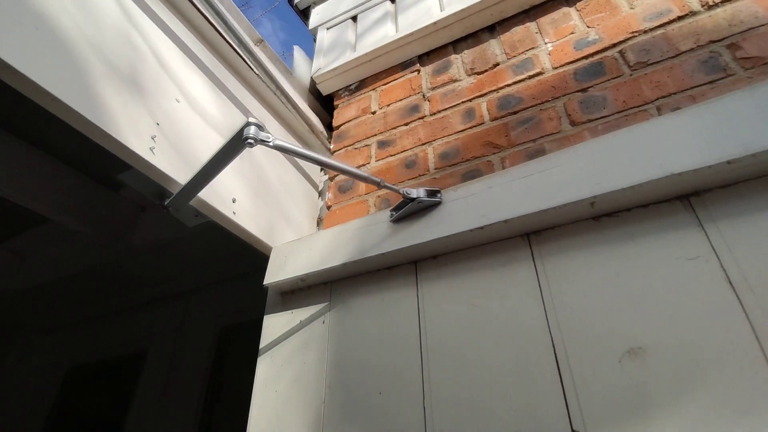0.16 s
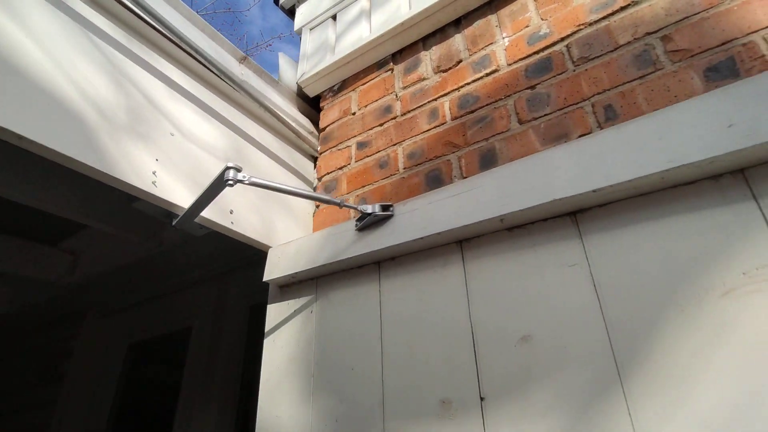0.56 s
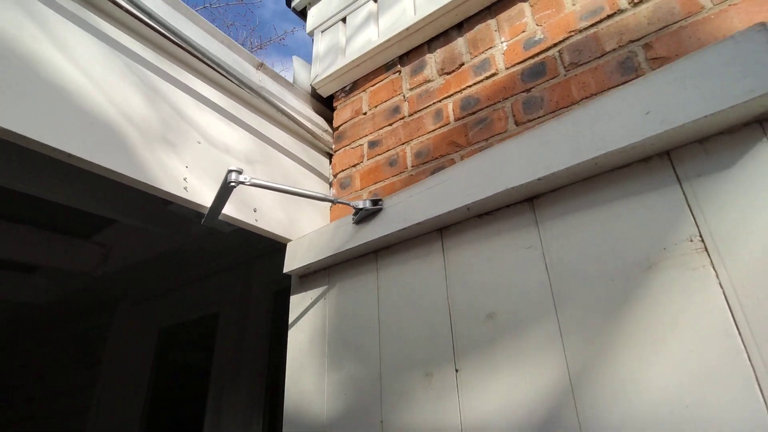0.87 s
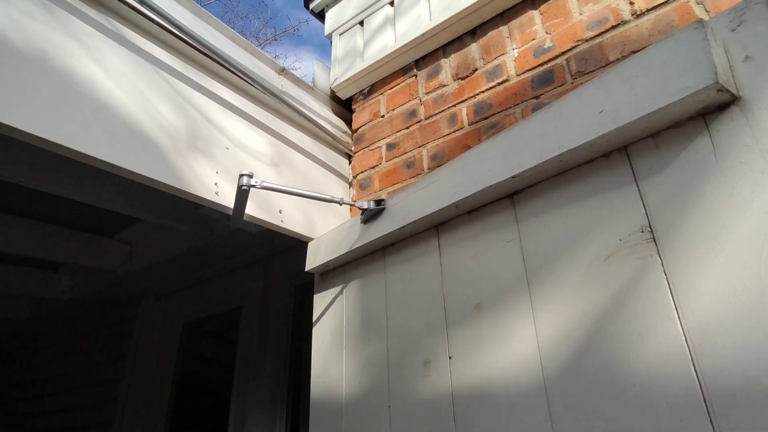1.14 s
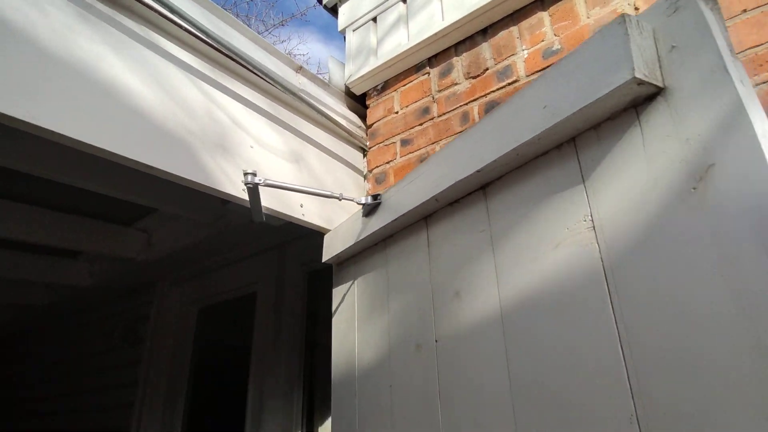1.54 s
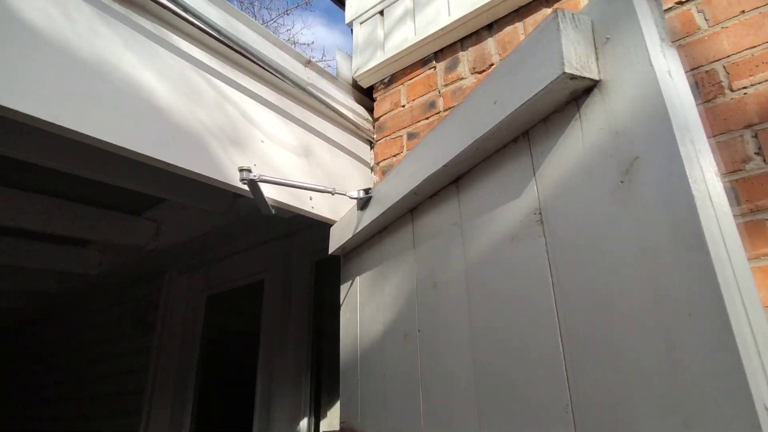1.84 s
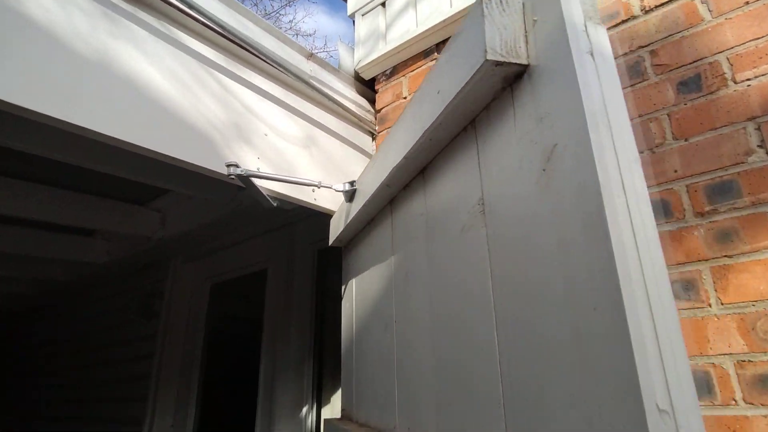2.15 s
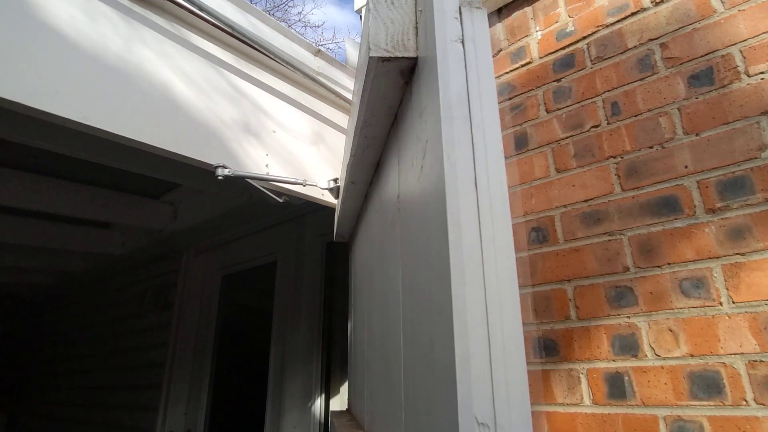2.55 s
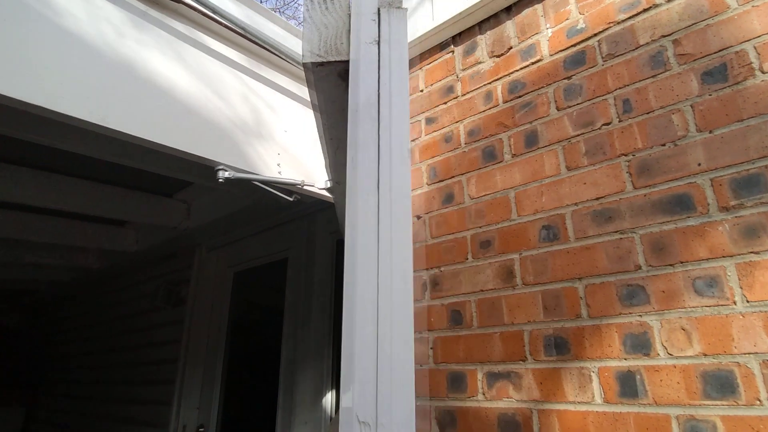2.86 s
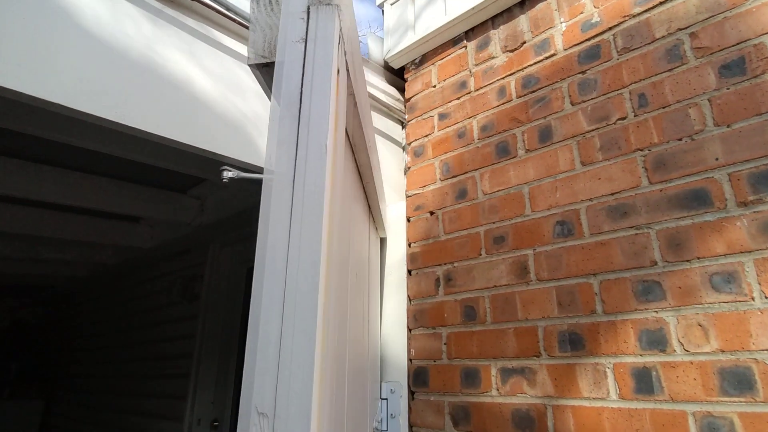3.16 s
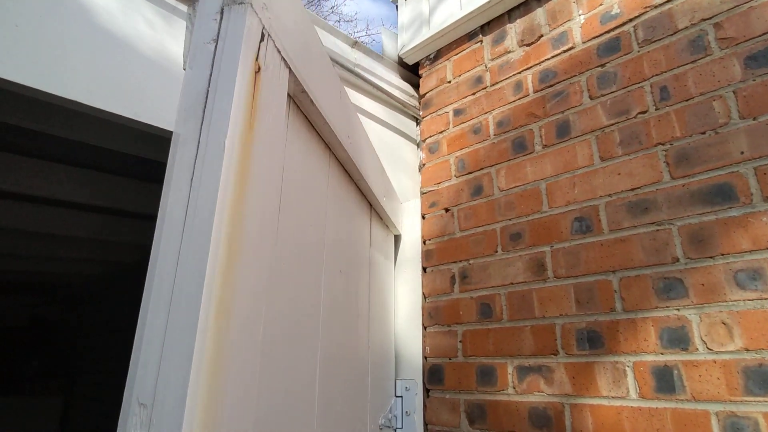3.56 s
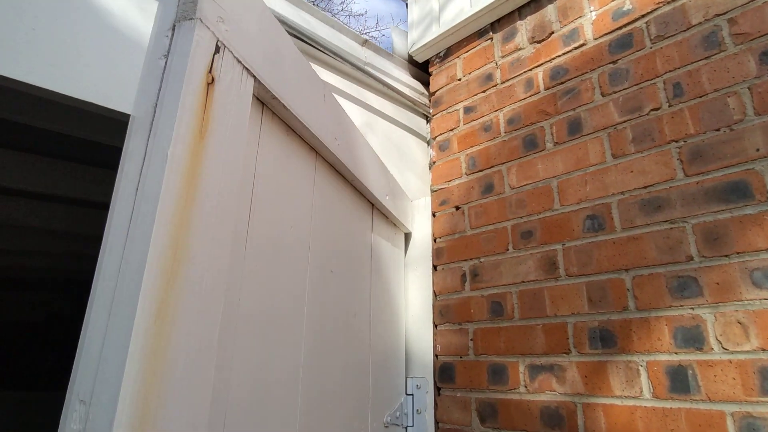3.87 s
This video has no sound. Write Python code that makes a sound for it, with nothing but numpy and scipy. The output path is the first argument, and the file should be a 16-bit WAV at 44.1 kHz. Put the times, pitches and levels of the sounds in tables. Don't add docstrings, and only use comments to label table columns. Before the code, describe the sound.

A small piston air compressor drones and clatters inside a garage a few metres away, ticks once from the door arm, then stops abruptly with a short hollow ring and air hiss; wind buffets the handheld microphone.

```python
import sys
import numpy as np
from scipy import signal
from scipy.fft import rfft, irfft
from scipy.io import wavfile

SR = 44100
rng = np.random.default_rng(int(sys.argv[2]) if len(sys.argv) > 2 else 0)


def how_loud(loudness_db):
    steps = np.asarray(loudness_db, float) / 20
    return 10 ** steps


def output_pcm(signal):
    pcm = np.clip(np.atleast_2d(signal).T, -1, 1) * 32767
    wavfile.write(sys.argv[1], SR, np.round(pcm).astype(np.int16))


N = 176400
T = np.arange(N) / SR
STROKE_HZ, STOP_S = 54.11, 1.915


def rms_one(x):
    return x / np.sqrt(np.mean(x ** 2) + 1e-20)


def in_time(rows):
    s, *columns = np.transpose(rows)
    return np.array([np.interp(T, s, column) for column in columns])


def at_hz(points, hz):
    point_hz, value = np.array(points)[:, 0], np.array(points)[:, 1]
    return np.interp(np.log(hz), np.log(point_hz), value)


def drift(rate_hz):
    r = np.exp(-80 * np.pi * rate_hz / SR)
    slow = signal.lfilter([1], [1, -2 * r, r * r], rng.standard_normal(N // 40 + 2002))[2000:]
    return np.interp(np.arange(N) / 40, np.arange(len(slow)), rms_one(slow))


def resonate(x, hz, width_hz):
    r = np.exp(-np.pi * width_hz / SR)
    feedback = [1, -2 * r * np.cos(2 * np.pi * hz / SR), r * r]
    return signal.lfilter([(1 - r * r) / 2, 0, (r * r - 1) / 2], feedback, x)


def coloured(spectrum, patchy_db):
    # f/Hz, correlation/-1..1
    likeness = [(60, 1), (180, 1), (550, -0.26), (1650, 0.0097), (4970, -0.09), (15000, 0.12)]
    hz = np.fft.rfftfreq(N, 1 / SR) + 1
    mid, side = rfft(rng.standard_normal((2, N)))
    alike = np.clip(at_hz(likeness, hz), -1, 1)
    pair = np.sqrt(1 + alike) * mid + np.sqrt(1 - alike) * side * [[1], [-1]]
    pair *= how_loud(at_hz(spectrum, hz)) * (hz > spectrum[0][0] / 2)
    octave, together = np.clip(np.log2(hz / 60), 0, 8), drift(5)
    out = 0
    for k in range(9):
        band = irfft(pair * np.clip(1 - abs(octave - k), 0, 1), N)
        out = out + band * how_loud(patchy_db * (1.27 * together + drift(24.0)))
    return rms_one(out)


def compressor():
    n = int(2.3 * SR)
    after = np.clip(T - STOP_S, 0, None)
    sag, rundown_s = 0.2, 0.15
    speed = 1 - sag * (1 - np.exp(-after[:n] / rundown_s))
    turn = 2 * np.pi * STROKE_HZ * np.cumsum(speed) / SR
    out = valve_clatter(np.pad(np.sin(turn), (0, N - n))) + narrow_whistles()
    out[:, :n] += piston_tones(turn)
    direct = out * how_loud(-292 * after)
    coasting = out * how_loud(-126 * after) * (T > STOP_S - 0.03)
    return direct + np.clip((T - STOP_S) / 0.045, 0, 1) * garage(coasting)


def piston_tones(turn):
    # multiple of stroke rate, level/dB, drift/(dB/s), echo share/0-1, echo cancels at t/s,
    # echo beat f/Hz
    strokes = [(1, -40.0, 0, 0.1, 0.85, 0.75), (2, -23.0, -3, 0.3, 0.65, 0.2),
               (3, -20.0, 0, 0.1, 1.95, 0.3), (4, -34.0, -5, 0.8, 0.45, 0.2), (5, -38.0, -2, 0.1, 0.8, 0.4),
               (6, -27.0, -4, 0.2, 0.4, 0.45), (7, -30.0, -1, 0.1, 0.0, 1.0), (8, -40.0, -7, 0.2, 0.1, 1.1),
               (9, -30.0, 0, 0.3, 1.05, 0.55), (10, -26.0, -3, 0.8, 0.55, 0.2),
               (11, -28.0, -2, 0.8, 0.95, 0.35), (12, -36.0, 7, 0.4, 0.65, 0.55),
               (13, -34.0, 8, 0.2, 0.1, 0.5), (14, -25.0, -2, 0.4, 0.45, 0.75),
               (15, -27.0, 1, 0.5, 0.05, 0.6), (16, -35.0, -2, 0.5, 0.8, 0.9),
               (17, -34.0, 3, 0.3, 0.05, 0.95), (18, -31.0, -3, 0.4, 1.4, 0.55),
               (19, -36.0, -1, 0.5, 0.35, 1.3), (20, -34.0, 0, 0.3, 0.75, 1.15),
               (21, -39.0, 3, 0.2, 0.45, 1.65), (22, -36.0, 4, 0.5, 0.4, 1.1),
               (23, -39.0, 2, 0.4, 0.2, 1.45), (24, -40.0, -1, 0.3, 0.75, 0.5),
               (25, -35.0, -1, 0.6, 0.8, 0.2), (26, -35.0, 3, 0.2, 0.9, 1.05),
               (29, -42.0, 0, 0.4, 0.55, 1.1), (31, -32.0, 14, 0.9, 1.7, 0.2),
               (32, -38.0, 3, 0.8, 1.35, 0.5), (33, -37.0, -1, 0.6, 1.0, 0.25),
               (34, -33.0, -11, 0.6, 0.5, 0.25)]
    # level/dB, echo share/0-1, echo cancels at t/s, echo beat f/Hz
    port_difference = [(-51.0, 0.1, 0.45, 0.85), (-40.0, 0.1, 0.55, 0.25), (-33.0, 0.2, 0.6, 0.2),
                       (-45.0, 0.4, 1.5, 0.6), (-47.0, 0.3, 0.5, 0.45), (-35.0, 0.1, 1.35, 0.35),
                       (-38.0, 0.8, 1.35, 0.2), (-39.0, 0.6, 1.85, 0.2), (-32.0, 0.6, 0.2, 0.55),
                       (-34.0, 0.5, -0.3, 0.4), (-30.0, 0.5, 0.55, 0.25), (-37.0, 0.5, 0.45, 0.45),
                       (-36.0, 0.2, -0.45, 0.35), (-27.0, 0.7, 0.9, 0.85), (-32.0, 0.5, 1.15, 0.4),
                       (-37.0, 0.4, 1.5, 0.4), (-42.0, 0.6, 0.55, 1.2), (-23.0, 0.5, 0.05, 0.25),
                       (-30.0, 0.4, 0.15, 0.55), (-32.0, 0.5, 1.05, 0.95), (-38.0, 0.3, 1.25, 0.65),
                       (-37.0, 0.4, 0.35, 0.65), (-39.0, 0.6, 0.2, 0.4), (-33.0, 0.3, 1.15, 0.45),
                       (-39.0, 0.3, 0.3, 1.55), (-40.0, 0.3, 0.1, 0.85), (-40.0, 0.9, 2.15, 0.25),
                       (-39.0, 0.5, 0.65, 0.65), (-39.0, 0.6, 1.3, 0.7), (-38.0, 0.6, 1.55, 0.6),
                       (-34.0, 0.6, 0.9, 0.2)]
    rows = [(*both, *across) for both, across in zip(strokes, port_difference)]

    # multiple,
    # level/dB
    faint = [(k, -41.5 - 0.3484 * (k - 30)) for k in [27, 28, 30, *range(35, 50)]]
    faint += [(k + 0.5, -47) for k in range(1, 16)]
    faint += [(8.5, -44)]
    echo_share, walk_m_per_s, sound_m_per_s = 0.31, 0.15, 343
    for k, level_db in faint:
        beat_hz = k * STROKE_HZ * walk_m_per_s / sound_m_per_s
        both = (k, level_db, 0, echo_share, rng.random(), beat_hz)
        rows.append((*both, level_db, echo_share, rng.random(), beat_hz))

    t = T[:len(turn)]
    walk = np.minimum(t, STOP_S)
    out = np.zeros((2, len(turn)))
    for k, level_db, slope, share, null_s, beat_hz, across_db, *across_echo in rows:
        start, lean = rng.uniform(-1, 1, 2)
        phase = k * turn + np.pi * start
        both = how_loud(level_db + slope * (walk - 1)) * echoed(phase, walk, share, null_s, beat_hz)
        across = how_loud(across_db) * echoed(phase + 1.36 + 0.14 * lean, walk, *across_echo)
        out += both + across * [[1], [-1]]
    return out


def echoed(phase, t, share, null_s, beat_hz):
    return np.sin(phase) - share * np.sin(phase + 2 * np.pi * beat_hz * (t - null_s))


def valve_clatter(stroke):
    # f/Hz, level per Hz/dB
    clatter_spectrum = [(30, -26), (150, -13.5), (240, -27), (750, -14.5), (2000, -14), (8200, -21.5),
                        (13500, -41), (15500, -56)]
    level = how_loud(-25.5 + 2 * (T - 1))
    return level * coloured(clatter_spectrum, patchy_db=0.7) * (1 + 0.024 * stroke)


def narrow_whistles():
    # f/Hz, width/Hz, level/dB, drift/(dB/s)
    whistles = [(1858, 18, -55, -14), (4544, 8, -49, 5), (6340, 70, -42, -3), (7850, 50, -54, 0),
                (8540, 200, -50, 0)]
    out = np.zeros((2, N))
    for hz, width_hz, level_db, slope in whistles:
        air = rng.standard_normal((2, N))
        whistle = rms_one(resonate(resonate(air, hz, width_hz), hz, width_hz))
        out += how_loud(level_db + slope * (T - 1)) * whistle
    return out


def garage(x):
    t60_s, low_hz, high_hz = 0.4, 170, 1500
    noise = rng.standard_normal((3, SR)) * how_loud(-60 * T[:SR] / t60_s)
    tail = noise[0] + noise[1:]
    band = signal.butter(1, [low_hz, high_hz], "band", fs=SR, output="sos")
    tail = signal.sosfilt(band, tail)
    tail = tail - 0.8 * resonate(tail, 447, 90)
    gain = how_loud(-12.5) * np.sqrt(SR / 2 / high_hz / np.sum(tail[0] ** 2))
    return gain / 2 * signal.fftconvolve(x.mean(axis=0)[None], tail)[:, :N]


def rings():
    # t/s, f/Hz, peak level/dB, t60/s
    garage_modes = [(1.945, 352, -26, 0.22), (1.95, 1072, -34, .15), (2.0, 196, -30, 0.15),
                    (2.005, 625, -44, 0.12), (2.005, 354, -36, 0.31), (2.005, 1096, -39, 0.36),
                    (2.035, 291, -31, 0.39), (2.06, 633, -31, 0.27), (2.07, 760, -33.5, .3),
                    (2.12, 272, -38, 0.22), (2.125, 474, -39.5, 0.28), (2.14, 767, -43, 0.33)]
    rise_s = 0.014
    out = np.zeros((2, N))
    for s, hz, peak_db, t60 in garage_modes:
        since = T[:N * 3 // 4] - s
        rise = np.exp(-(np.clip(since, None, 0) / rise_s) ** 2)
        swell = how_loud(peak_db - 60 * np.clip(since, 0, None) / t60) * rise
        port_phase = rng.uniform(-0.7, 0.75, (2, 1))
        out[:, :len(since)] += swell * np.sin(2 * np.pi * hz * since + port_phase)
    return out


def vent():
    # f/Hz, level per Hz/dB
    hiss_spectrum = [(1470, -18), (2500, -13), (3800, -11.5), (4140, -10.5), (4780, -11), (8100, -5),
                     (11300, -11), (15500, -9.5)]
    # t/s, level/dB
    air_flow = [
        (1.86, -72.5),
        (1.88, -34),
        (1.91, -20),
        (2.11, -23.5),
        (2.18, -30),
        (2.3, -35),
        (2.6, -42),
        (2.8, -79),
    ]
    return how_loud(in_time(air_flow)) * coloured(hiss_spectrum, patchy_db=0.8)


def wind():
    # t/s, left level/dB, right level/dB
    port_wind = [(0, -75, -81), (2.0, -38, -55), (2.2, -49, -25), (2.45, -40.5, -42.5),
                 (2.65, -38.5, -41.5), (2.8, -38, -29.5), (3.0, -40, -31), (3.2, -40, -42),
                 (3.42, -40, -30), (3.55, -42.5, -42.5), (4, -44, -41)]
    # t/s, peak level/dB, f/Hz, left minus right/dB
    buffets = [(2.173, -21, 122, -11), (2.197, -14, 131, -24), (2.239, -18, 100, -25),
               (2.266, -11.5, 95, -35), (2.34, -20.5, 84.5, -17), (2.381, -21, 162, -31),
               (2.742, -19.5, 155, -18), (2.749, -42, 105, 21), (2.789, -12, 103, -13),
               (2.85, -8.5, 112, -30), (2.862, -8.5, 117, -34), (2.939, -27, 110, -14),
               (2.964, -20, 129, -25), (3.002, -10.5, 102, -32), (3.041, -20, 114, -19),
               (3.084, -20, 95, -23), (3.118, -24, 95, -7), (3.275, -20.5, 85, -24),
               (3.356, -14.5, 95, -25), (3.409, -18.5, 102, -18), (3.43, -16, 102, -14)]
    centre_hz, width_hz, lump_db, buffet_cycles = 95, 63, 2.5, 0.59
    low = resonate(rng.standard_normal((2, N)), centre_hz, width_hz)
    low = resonate(low, centre_hz, 2.45 * width_hz)
    lumps = how_loud(lump_db * np.array([drift(10.6), drift(44)]))
    out = rms_one(low * lumps) * how_loud(in_time(port_wind))
    for s, peak_db, hz, pan_db in buffets:
        near = int(s * SR) + np.arange(-SR // 20, SR // 20)
        cycles = (T[near] - s) * hz
        push = np.exp(-(cycles / buffet_cycles) ** 2) * np.cos(2 * np.pi * cycles - 0.6)
        out[:, near] += how_loud(peak_db + np.array([[pan_db], [0]])) * push
    return out


def scuffs():
    # f/Hz, level per Hz/dB
    grit_spectrum = [(150, -33), (250, 6.5), (1050, 5), (1360, 2.5), (2270, -3.5), (4000, -7), (5500, -5),
                     (11700, -47)]
    # t/s, length/s, level/dB, ringing f/Hz
    shoe_strokes = [
        (2.80, 0.04, -46, 2200),
        (2.848, 0.08, -38.5, 2230),
        (2.87, .03, -47, 3500),
        (3.03, 0.055, -42, 1750),
        (3.126, .03, -47, 900),
    ]
    attack_s, tail_s, ring_db, ring_width_hz = 0.015, 0.055, 0.4, 300
    grit, out = coloured(grit_spectrum, patchy_db=0.8), 0
    for s, length, level_db, hz in shoe_strokes:
        release = np.exp(-np.clip(T - s - length, 0, None) / tail_s)
        stroke = np.clip((T - s) / attack_s, 0, 1) * release
        ring = how_loud(ring_db) * rms_one(resonate(grit, hz, ring_width_hz))
        out = out + how_loud(level_db) * stroke * (grit + ring)
    return out


def tick():
    # t/s, level/dB, f/Hz, t60/s
    s, level_db, hz, t60 = (.919, -16, 5750, .045)
    since = np.clip(T - s, 0, None)
    crack = resonate(resonate(rng.standard_normal(N), 3200, 3500), 4200, 4500)
    crack = 0.9 * rms_one(crack) * how_loud(-60 * since / 0.014)
    ring = 0.6 * how_loud(-60 * since / t60) * np.sin(2 * np.pi * hz * since)
    return how_loud(level_db) * np.minimum(since * 2000, 1) * (crack + ring)


def leaves():
    # f/Hz, level per Hz/dB
    rustle_spectrum = [(410, -13), (700, 2), (993, 3), (1540, 3), (8000, 3.5), (11300, -2.5), (13000, -5.5),
                       (15500, -4)]
    # t/s, level/dB
    breeze = [(2.3, -41.5), (2.62, -34), (2.72, -42), (2.86, -37.5), (3.17, -44.5), (3.22, -47),
              (3.43, -48), (3.46, -41), (3.61, -41), (3.7, -48), (3.77, -41), (3.84, -44.5), (3.9, -37.5),
              (4, -42)]
    return how_loud(in_time(breeze)) * coloured(rustle_spectrum, patchy_db=0.9)


def far_air():
    # f/Hz, level per Hz/dB
    far_spectrum = [(60, 0), (250, -9), (450, -14.5), (1200, -15), (3000, -24), (8000, -21.5), (15500, -37)]
    return how_loud(-42) * coloured(far_spectrum, patchy_db=0.0)


def scene():
    return compressor() + rings() + vent() + wind() + scuffs() + tick() + leaves() + far_air()


def roll_off(x):
    return signal.sosfilt(signal.butter(12, 15770, fs=SR, output="sos"), x)


def record(dry):
    # f/Hz, width/Hz, share removed/0-1
    treble_dips = [(5000, 300, .4), (9000, 400, .45), (11200, 700, .6)]
    for hz, width_hz, share in treble_dips:
        dry = dry - share * resonate(dry, hz, width_hz)
    top_edge = signal.cheby1(11, 0.5, 15350, fs=SR, output="sos")
    bass_rolloff = signal.butter(3, 44, "high", fs=SR, output="sos")
    mix = signal.sosfilt(bass_rolloff, signal.sosfilt(top_edge, dry))
    return roll_off(mix)


dry = scene()
out = record(dry)
output_pcm(out)
```